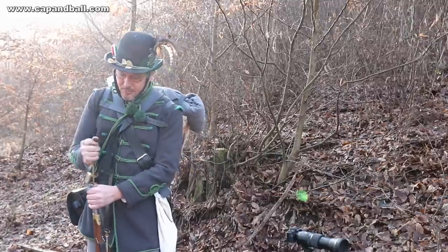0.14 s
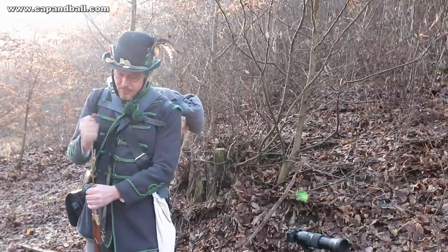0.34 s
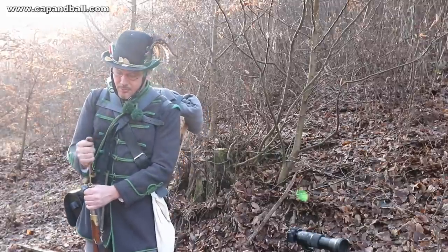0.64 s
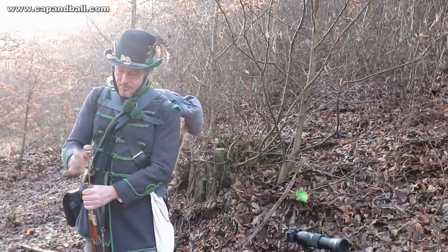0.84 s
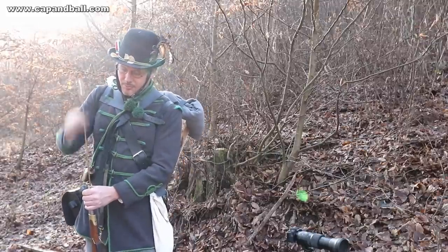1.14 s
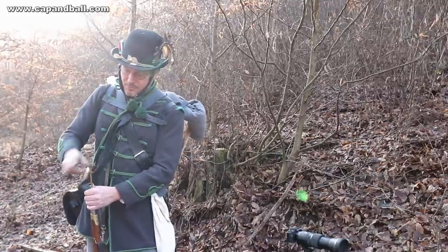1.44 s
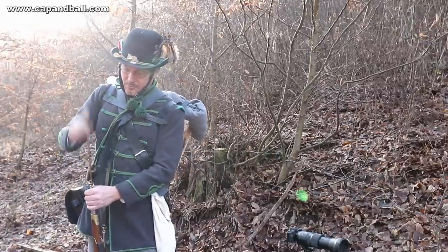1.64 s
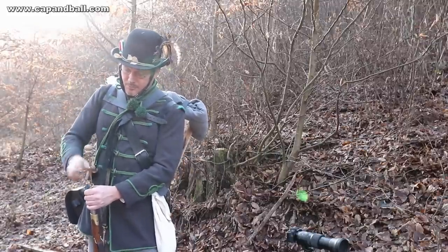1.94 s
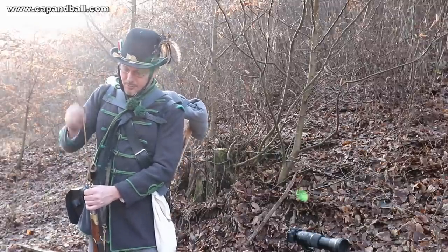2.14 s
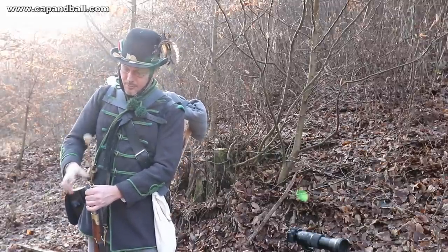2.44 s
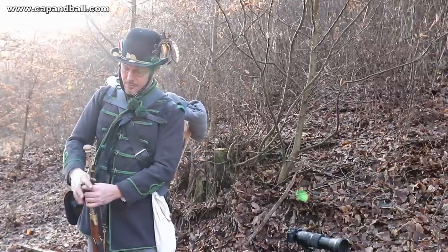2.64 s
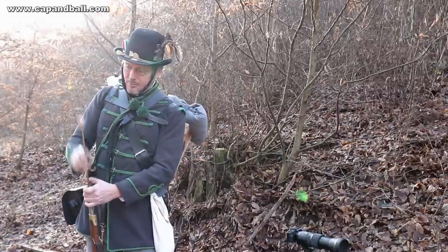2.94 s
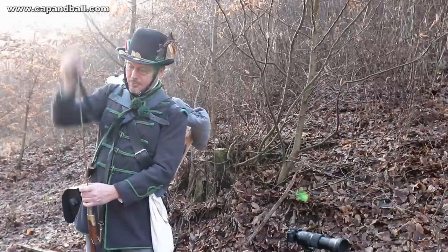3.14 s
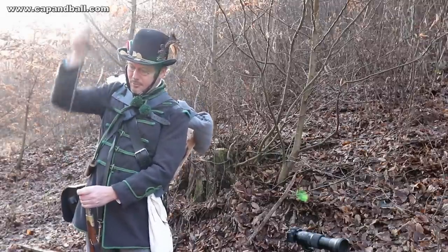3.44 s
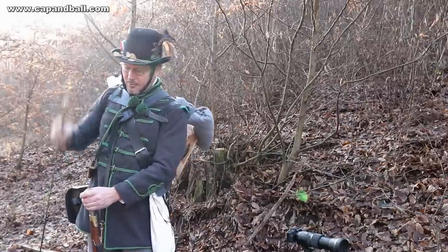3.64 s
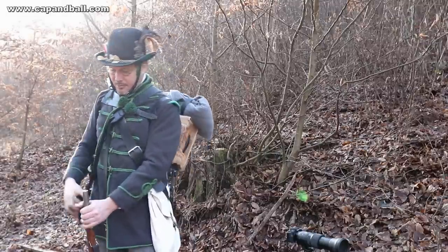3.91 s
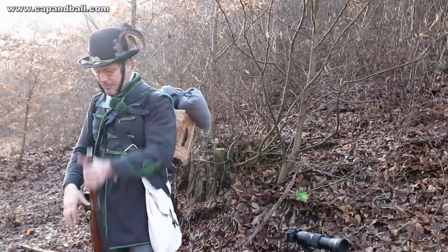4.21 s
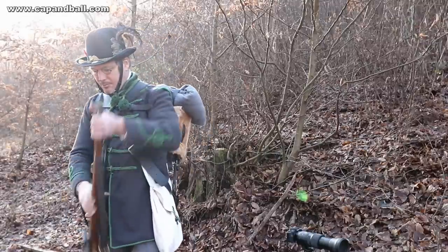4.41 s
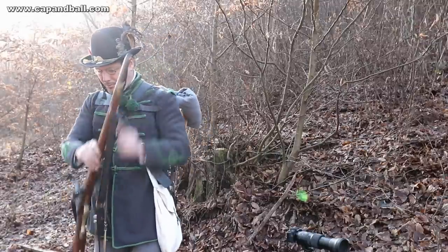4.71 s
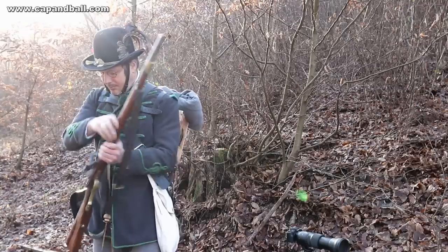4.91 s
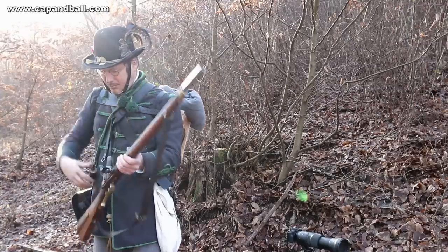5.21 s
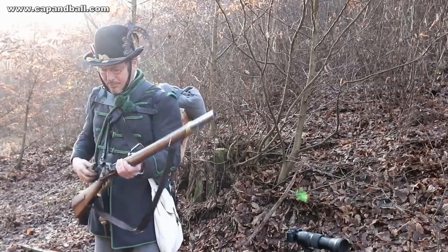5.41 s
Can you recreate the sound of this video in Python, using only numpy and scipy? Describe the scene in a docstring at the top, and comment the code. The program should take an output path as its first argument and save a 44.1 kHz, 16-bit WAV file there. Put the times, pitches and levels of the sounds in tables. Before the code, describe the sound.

Bright steel clacks and scraping of a rod ramming a ball down a rifle, small handling clicks, then a far-off shot at the end.

```python
"""A quiet wood: a ball is rammed down a muzzle-loading rifle that stands to the left.
Ramrod: coloured random contacts through steel modes; each stop on the ball is a band-passed click with gun ring.
Handling: short bursts of contacts, metallic for the fittings, dull for the stock; one small 3 kHz ping of the gear.
Far shot: N-shaped pulses, a low boom and enveloped noise rolling through the trees.
Background: shaped noise for still air, a distant drone and soft low thuds."""
import sys
import numpy as np
from scipy import signal
from scipy.fft import rfft, irfft, next_fast_len
from scipy.io import wavfile
from scipy.ndimage import map_coordinates

SR = 44100
rng = np.random.default_rng(int(sys.argv[2]) if len(sys.argv) > 2 else 0)


def dump_mix(stems):
    """Bounce the given channels to the path in sys.argv[1] as a 16-bit WAV at rate SR."""
    frames = np.atleast_2d(stems).T  # one column per channel
    limited = np.clip(frames, -1, 1)  # hard clip at full scale
    pcm = np.round(limited * 32767).astype(np.int16)
    wavfile.write(sys.argv[1], SR, pcm)


N = 245195
TIME = np.arange(N) / SR

# Levels are relative, before the gains in the functions. decay_s and swell_s are 1/e times.
# Still air: hz, density_db
AIR_COLOUR = [(12, -58), (20, -27), (55, -2), (177, -14), (228, -8), (446, -16.5), (527, -17.5),
              (698, -23.5), (923, -24), (1120, -24), (1220, -23), (1530, -25), (5230, -33.5), (8410, -29.5),
              (16000, -38.5)]
# Distant drone, swelling and sinking: time_s, level_db
DRONE_LEVEL = [(0, -73), (.8, -57.5), (1.25, -44.5), (1.7, -50.5), (2.8, -59), (3.6, -48.5), (4.2, -48.5),
               (4.7, -55), (5.56, -52.5)]
# Drone spectrum: hz, density_db
DRONE_COLOUR = [(100, -32.5), (195, -10.5), (235, 6), (285, -8), (335, 1.5), (400, -5), (480, -12),
                (700, -28.5), (1200, -35.5)]
# Soft low thuds: peak_s, level_db, decay_s
THUDS = [(.005, -40.5, 0.019), (3.31, -50, 0.072), (3.427, -39.5, 0.026)]
# Thud spectrum: hz, density_db
THUD_COLOUR = [(20, -24.5), (50, -2.5), (90, 3), (130, -8.5), (250, -17), (800, -41)]
# Far shot, direct and off a slope: start_s, level_db, pulse_length_s
SHOT_PULSES = [(5.3347, -26, 0.0009), (5.3395, -11.5, 0.00092), (5.348, -13, 0.0012), (5.368, -15, 0.0011)]
# Roll through the trees: time_s, level_db
ROLL_LEVEL = [(5.30, -19.5), (5.350, -21.5), (5.362, -25), (5.395, -27), (5.422, -27.5), (5.45, -22.5),
              (5.48, -23.5), (5.53, -22.5), (5.6, -32)]
# Roll spectrum: hz, density_db
ROLL_COLOUR = [(120, -39), (200, -11.5), (254, -24), (433, -8.5), (496, -10.5), (954, 0.5), (1340, -5),
               (2290, -21.5), (2580, -21), (4750, -37), (7000, -48), (9100, -41), (15400, -120)]
# Left-right correlation of sound from all around: hz, correlation (-1..1)
LIKENESS = [(60, 0.9), (180, 0.92), (550, .5), (1650, -0.13), (5000, 0.29), (15000, -0.34)]
# Clicks of small metal fittings: peak_s, level_db, decay_s
FITTINGS = [(3.8128, -40.5, .0072), (3.942, -37, 0.014), (3.983, -47, 0.0078), (4.0425, -45, .006),
            (4.1506, -45, .008), (4.1937, -33, 0.011), (4.431, -39.5, 0.007), (4.471, -45.5, 0.022),
            (4.5274, -37, 0.0025), (4.566, -45.5, 0.034), (5.417, -33.5, 0.012)]
# Fitting spectrum: hz, density_db
FITTING_COLOUR = [(500, -24.5), (1500, -16.5), (4000, -11.5), (7000, -2.5), (9000, -0.5), (11500, -4.5),
                  (13000, -8.5), (16000, -18.5)]
# Dull bumps on the wooden stock: peak_s, level_db, decay_s
BUMPS = [(3.857, -35, 0.0042), (4.572, -51.5, 0.043), (5.074, -48.5, 0.021)]
# Bump spectrum: hz, density_db
BUMP_COLOUR = [(100, -26), (500, 2.5), (1000, 1), (1800, 4), (3000, -4), (5000, -29.5), (12000, -23)]
# Ringing modes of rod and barrel: hz, level_db, t60_s
STEEL_MODES = [(1375, -2, .055), (1430, -3, .05), (1605, -1, .06), (2030, -5, .04), (2300, 1, .04),
               (2850, -5, .03), (3600, -5, .03), (4610, -3, .035), (6630, -6, .03), (8110, -8, .04),
               (9000, -6, .09), (9180, -7, .06), (9630, -6, .06), (11800, -4, .03), (12130, -6, .06),
               (12320, -8, .05), (12700, -6, .05)]
# Rod slides in the bore: time_s, low_scrape_db, high_scrape_db
SLIDE = [(0.0, -43, -44), (0.3, -44, -44.5), (0.66, -51, -53), (0.9, -43, -54), (1.07, -61, -47),
         (1.3, -51, -66), (1.45, -42, -42.5), (1.84, -48.5, -51), (2.11, -44, -40), (2.59, -44, -49),
         (2.75, -87, -81), (3.0, -56, -60), (3.21, -52.5, -52), (3.55, -69, -68)]
# Rod strikes the bore wall: peak_s, low_chatter_db, high_chatter_db, decay_s
TOUCHES = [(0.1755, -24, -21.5, 0.011), (0.2035, -28.5, -22.5, 0.023), (0.2559, -30.5, -30, 0.0043),
           (0.4669, -29, -26.5, 0.018), (0.873, -32, -24, 0.0087), (0.9214, -28.5, -25.5, 0.0061),
           (0.97, -32, -30.5, 0.017), (0.9982, -30, -23, 0.01), (1.046, -39, -31.5, 0.017),
           (1.078, -32.5, -27, .011), (1.161, -48, -33, .016), (1.2815, -40.5, -35.5, 0.079),
           (1.569, -36.5, -28.5, 0.042), (1.637, -60, -26, 0.005), (1.7686, -32.5, -29, 0.015),
           (1.911, -39, -31.5, 0.01), (1.9224, -27, -28, 0.0095), (2.056, -25.5, -23.5, 0.012),
           (2.1552, -31.5, -22.5, 0.014), (2.3391, -29.5, -24.5, 0.005), (2.3834, -47, -30, 0.0081),
           (2.5618, -37.5, -30.5, 0.021), (2.601, -42, -31, 0.023), (2.7624, -34, -32, 0.0099),
           (2.9714, -49.5, -33, 0.0035), (3.036, -40.5, -46, 0.018), (3.11, -47, -35, .007),
           (3.302, -37, -33.5, 0.063), (3.3723, -34, -28, 0.004)]
# Rod lands: peak_s, low_chatter_db, high_chatter_db, decay_s, knock_db, knock_hz, gun_ring_db, ping_db
BLOWS = [(0.0638, -27.5, -29.5, 0.0077, 0.5, 2380, -5, -20), (.3358, -27, -22, 0.018, -1, 2280, 2.5, -18.5),
         (0.6126, -25.5, -22, 0.02, -3, 2150, 2.5, -20), (0.8541, -30, -25.5, 0.03, -1.5, 1656, 2.5, -16.5),
         (1.5056, -17.5, -13, 0.013, -11, 2420, -10.5, -18.5),
         (1.9872, -17.5, -14, 0.014, -12, 1760, 0, -28), (2.4765, -22, -17, 0.0094, -6.5, 1610, 2, -8.5),
         (2.7106, -32, -25, 0.016, -46, 1690, -14.5, -16)]
# Low chatter and scrape spectrum: hz, density_db
LOW_CHATTER_COLOUR = [(150, -13.5), (600, -12), (1050, -12), (1400, -6.5), (2400, 2), (3200, 0.5),
                      (4200, -1.5), (5500, -0.5), (9000, -86.5)]
# High chatter and scrape spectrum: hz, density_db
HIGH_CHATTER_COLOUR = [(2000, -37.5), (3800, -26), (5000, 0.5), (6600, 1), (9000, -3), (12000, -5),
                       (13500, -6.5), (15500, -15)]
# High ping of the rod: hz, density_db
PING_COLOUR = [(6000, -24), (10000, -6), (11400, -15), (12200, 4), (13000, -13.5), (14000, -9),
               (16000, -11)]
# Thin steel rasps of the rod; the last row is a small 3 kHz ping of the gear:
# peak_s, level_db, swell_and_decay_s
RASPS = [(1.83, -47, 0.052), (3.182, -43, 0.018), (3.224, -42, 0.0072), (5.08, -45, 0.0067)]
# Spectrum of rasps and gear ping: hz, density_db
RASP_COLOUR = [(1200, -20), (2500, 12), (3150, 17), (4000, 14), (5200, -16), (10000, -49)]
# Modes of the loaded gun under a blow: hz, level_db, t60_s
GUN_MODES = [(167, -35.5, 0.034), (357, -27.5, 0.016), (612, -26.5, 0.017), (932, -24, 0.018),
             (1378, -16, .018), (1890, -21, 0.032), (2440, -26, 0.016), (2920, -16, 0.014),
             (3563, -13, 0.0069)]
# Left minus right for sound from the rifle: hz, difference_db
SHADING = [(100, -1), (1200, -1), (2400, -4.5), (4400, -2.5), (8000, -.5), (12000, 5), (15000, 5)]
# Echoes from the trees: hz, gain_db
WOOD_COLOUR = [(100, -22.5), (800, -9), (1800, -9.5), (2600, -1.5), (4000, -5.5), (8000, -9), (16000, -16)]

BOOM_HZ, BOOM_DB, BOOM_T60_S = 90, -19, 0.1
# Ticks after a fitting click: mean gap, level relative to the click, loss per further tick
SWING_S, FIRST_SWING_DB, SWING_LOSS_DB, SWING_DECAY_S = .028, -12.5, 6.5, 0.0091
# Light touches while the rod moves; level relative to the scrape
LIGHT_TOUCHES_PER_S = 13
LIGHT_TOUCH_DB, LIGHT_TOUCH_SPREAD_DB, LIGHT_TOUCH_DECAY_S = 9, 4, .008
BLOW_SWELL_S, PING_DECAY_S = 0.0081, 0.012
# Rattle before and shiver after a blow; levels relative to its chatter
RUN_IN_S, RUN_IN_DECAY_S, RUN_IN_LOW_DB, RUN_IN_HIGH_DB = 0.023, 0.018, -11, -13
SHIVER_DECAY_S, SHIVER_LOW_DB, SHIVER_HIGH_DB = 0.039, -16.5, -9
CUTOFF_HZ = 15900


def from_db(db):
    """Decibels to amplitude gain."""
    return 10 ** (np.asarray(db) / 20)


def rms_one(x):
    """Scale to unit rms."""
    return x / np.sqrt(np.mean(x ** 2) + 1e-20)


def level(rows, axis=1):
    """Gain in time from a dB column, -120 dB outside the curve."""
    rows = np.array(rows)
    return from_db(np.interp(TIME, rows[:, 0], rows[:, axis], left=-120, right=-120))


def at_hz(points, hz):
    """Read a spectrum on a log-frequency axis."""
    points = np.array(points)
    return np.interp(np.log(hz + 1), np.log(points[:, 0]), points[:, 1])


def colour(x, spectrum, size=4096):
    """Minimum-phase filter with the given spectrum, by folding the cepstrum."""
    log_gain = np.log(from_db(at_hz(spectrum, np.fft.rfftfreq(size, 1 / SR))))
    cepstrum = irfft(log_gain)
    cepstrum[1:size // 2] *= 2
    cepstrum[size // 2 + 1:] = 0
    response = irfft(np.exp(rfft(cepstrum)))
    response = response.reshape((1,) * (x.ndim - 1) + (-1,))
    return signal.oaconvolve(x, response, axes=-1)[..., :x.shape[-1]]


def coloured_unit(x, spectrum):
    """Colour a white signal, keeping its power."""
    gains = from_db(at_hz(spectrum, np.linspace(0, SR / 2, num=4096)))
    return colour(x, spectrum) / np.sqrt(np.mean(gains ** 2))


def ring(x, hz, t60_s):
    """Two-pole resonator: a unit click rings as a decaying sine of starting height 1."""
    radius = from_db(-60 / (t60_s * SR))
    angle = 2 * np.pi * hz / SR
    return signal.lfilter([0, np.sin(angle)], [1, -2 * radius * np.cos(angle), radius ** 2], x + 1e-18)


def burst(peak_s, decay_s, swell_s):
    """Envelope rising exponentially to a peak of 1 and decaying after it."""
    out = np.zeros(N)
    near = slice(max(int((peak_s - .1) * SR), 0), int((peak_s + .3) * SR))
    after_s = TIME[near] - peak_s
    out[near] = np.exp(np.minimum(after_s / swell_s, -after_s / decay_s))
    return out


def wander(per_s):
    """Random line through 1000 normal knots, per_s knots a second; holds the last one."""
    knots = rng.standard_normal(1000)
    return np.interp(TIME * per_s, np.arange(len(knots)), knots)


def contacts(per_s, spread_db):
    """Random impacts of uneven size and sign, partly shared by the sides; about unit rms."""
    excess_db = spread_db * np.minimum(rng.exponential(1, (3, N)), 4)
    sizes = from_db(excess_db) * rng.choice([-1, 1], (3, N))
    stream = rms_one(sizes * (rng.random((3, N)) < per_s / SR))
    own_share = .3  # of the power on each side
    return np.sqrt(1 - own_share) * stream[0] + np.sqrt(own_share) * stream[1:]


def surround(spectrum):
    """Diffuse noise whose left-right correlation follows LIKENESS; unit rms."""
    size = next_fast_len(N)
    hz = np.fft.rfftfreq(size, 1 / SR)
    alike = np.clip(at_hz(LIKENESS, hz), -1, 1)
    mid, side = rfft(rng.standard_normal((2, size)))
    both = np.sqrt(1 + alike) * mid + np.sqrt(1 - alike) * side * [[1], [-1]]
    return rms_one(irfft(both * from_db(at_hz(spectrum, hz)), size)[:, :N])


def background():
    """Still air, a distant drone and a few soft low thuds, all shaped noise."""
    air = from_db(-49.5) * surround(AIR_COLOUR)
    drone = level(DRONE_LEVEL) * surround(DRONE_COLOUR)
    thuds = sum(from_db(db) * burst(s, decay_s, swell_s=0.018) for s, db, decay_s in THUDS)
    return air + drone + thuds * surround(THUD_COLOUR)


def far_shot():
    """Dulled N-shaped pulses, a low boom, then the roll of echoes from wooded slopes."""
    arrival_s = SHOT_PULSES[0][0]
    pulses = np.zeros(N)
    for s, db, length_s in SHOT_PULSES:
        inside = (TIME >= s) & (TIME < s + length_s)
        pulses += from_db(db) * (2 * (TIME - s) / length_s - 1) * inside
    pulses = signal.sosfilt(signal.butter(4, 2100, fs=SR, output="sos"), pulses)
    start = signal.unit_impulse(N, round(arrival_s * SR))
    boom = from_db(BOOM_DB) * ring(start, BOOM_HZ, BOOM_T60_S)
    opening = np.clip((TIME - arrival_s) / .0005, 0, 1)
    echoes = surround(ROLL_COLOUR) + from_db(-17.0) * surround(THUD_COLOUR)
    return pulses + boom + opening * level(ROLL_LEVEL) * echoes


def steel(x, ring_db, direct_db):
    """Contacts heard directly and through rod and barrel modes, favoured by turns as the contact moves."""
    rings = 0
    for hz, mode_db, t60_s in STEEL_MODES:
        drive = x * from_db(4.5 * wander(per_s=20))
        unit_peak = 2 * np.log(1000) / (t60_s * SR)  # about unity gain at resonance
        rings = rings + from_db(mode_db) * ring(drive, hz, t60_s) * unit_peak
    return from_db(direct_db) * x + from_db(ring_db) * rings


def fitting_clicks(count=3):
    """Each click, then lighter ticks at uneven gaps as the fitting swings; rows like FITTINGS."""
    delays_s = SWING_S * np.cumsum(rng.uniform(.6, 1.4, (len(FITTINGS), count)), axis=1)
    clicks = list(FITTINGS)
    for (s, db, _), row in zip(FITTINGS, delays_s):
        for k, delay_s in enumerate(row):
            clicks.append((s + delay_s, db + FIRST_SWING_DB - SWING_LOSS_DB * k, SWING_DECAY_S))
    return clicks


def handling():
    """Fittings click and hands bump the stock as the rifle is taken up."""
    clicks = sum(from_db(db) * burst(s, decay_s, swell_s=0.00048) for s, db, decay_s in fitting_clicks())
    bumps = sum(from_db(db) * burst(s, decay_s, swell_s=0.0012) for s, db, decay_s in BUMPS)
    metal = coloured_unit(clicks * contacts(per_s=7600, spread_db=4.5), FITTING_COLOUR)
    wood = coloured_unit(bumps * contacts(per_s=15000, spread_db=4.5), BUMP_COLOUR)
    return steel(metal, ring_db=-3.5, direct_db=4.0) + wood


def touches():
    """Hard touches, plus light ones at uneven gaps that follow the slide level; rows like TOUCHES."""
    chance = rng.random((60, 3))
    times_s = np.cumsum(.3 + 1.4 * chance[:, 0]) / LIGHT_TOUCHES_PER_S
    slide_s, low_db, high_db = np.transpose(SLIDE)
    over_db = LIGHT_TOUCH_DB + LIGHT_TOUCH_SPREAD_DB * (2 * chance[:, 1:] - 1)
    rows = list(TOUCHES)
    for s, (low_over, high_over) in zip(times_s, over_db):
        if s < slide_s[-1]:
            low = np.interp(s, slide_s, low_db) + low_over
            high = np.interp(s, slide_s, high_db) + high_over
            rows.append((s, low, high, LIGHT_TOUCH_DECAY_S))
    return rows


def strokes():
    """Rattle on the way in, chatter on landing, shiver afterwards: envelope, low_db, high_db."""
    hits = []
    for s, low, high, decay_s, *_ in BLOWS:
        run_in = burst(s - RUN_IN_S, RUN_IN_DECAY_S, swell_s=0.003)
        shiver = burst(s, SHIVER_DECAY_S, BLOW_SWELL_S)
        hits += [(run_in, low + RUN_IN_LOW_DB, high + RUN_IN_HIGH_DB),
                 (burst(s, decay_s, BLOW_SWELL_S), low, high),
                 (shiver, low + SHIVER_LOW_DB, high + SHIVER_HIGH_DB)]
    return hits


def rod_chatter_and_rasps(touched, first_contact_db=15.0):
    """The whipping rod rattles on the bore and scrapes as it slides; thin rasps and a gear ping join in."""
    hits = strokes()
    hits += [(burst(s, decay_s, swell_s=0.00063), low, high) for s, low, high, decay_s in touched]
    low_force = np.sqrt(sum((shape * from_db(low)) ** 2 for shape, low, _ in hits))
    high_force = np.sqrt(sum((shape * from_db(high)) ** 2 for shape, _, high in hits))
    ping_force = sum(from_db(db) * burst(s, PING_DECAY_S, swell_s=0.0023) for s, *_, db in BLOWS)
    rasp_force = sum(from_db(db) * burst(s, length_s, length_s) for s, db, length_s in RASPS)

    rattle = contacts(per_s=8000, spread_db=2.5)
    scrape = contacts(per_s=3000, spread_db=3.5)
    rattle = rattle * from_db(1.8 * wander(per_s=300))  # bounces in clusters
    # every touch opens with one hard contact
    rattle[:, [round(row[0] * SR) for row in touched]] += from_db(first_contact_db)
    scrape = scrape * from_db(2.5 * wander(per_s=90))

    low = from_db(1.0) * rattle * low_force + from_db(-1.5) * scrape * level(SLIDE, axis=1)
    high = rattle * high_force + from_db(1.0) * scrape * level(SLIDE, axis=2)
    ping = contacts(per_s=9000, spread_db=1.5) * ping_force
    struck = coloured_unit(low, LOW_CHATTER_COLOUR) + coloured_unit(high, HIGH_CHATTER_COLOUR)
    struck = struck + coloured_unit(ping, PING_COLOUR)
    rasps_and_gear_ping = coloured_unit(scrape * rasp_force, RASP_COLOUR)
    return steel(struck, ring_db=1.5, direct_db=-2.5) + rasps_and_gear_ping


def clinks(touched, clink_db=-11.0, spread_db=5.5, count=6):
    """Each touch rings the first modes, with strengths that depend on the contact point (random)."""
    s, db = np.transpose(touched)[:2]
    shares = rng.standard_normal((100, count))[:len(s)]
    out = np.zeros(N)
    for (hz, mode_db, t60_s), share in zip(STEEL_MODES, shares.T):
        kicks = np.zeros(N)
        kicks[np.round(s * SR).astype(int)] = from_db(db + clink_db + mode_db + spread_db * share)
        out += ring(kicks, hz, t60_s)
    # leaves only the clear ring, without a dull thud under it
    return signal.sosfilt(signal.butter(4, 1150, "high", fs=SR, output="sos"), out + 1e-18)


def band_click(kick, hz, ratio):
    """Click band-passed from hz / ratio to hz * ratio."""
    return signal.sosfilt(signal.butter(2, [hz / ratio, hz * ratio], "band", fs=SR, output="sos"), kick)


def knocks(crack_db=22.5, edge_db=-13, rebound_db=-6.5, rebound_s=0.00155):
    """Rod stops dead on the ball: short crack with broad edge, quick rebound, ring of the whole gun."""
    out = np.zeros(N)
    kick = signal.unit_impulse(SR // 10)
    body = 0
    for k, (hz, db, t60_s) in enumerate(GUN_MODES):
        body = body + from_db(db) * ring(kick, hz, t60_s) * (-1) ** k  # alternate polarity
    delays_s = rebound_s * rng.uniform(.92, 1.08, len(BLOWS))
    for (s, *_, knock_db, hz, body_db, _), delay_s in zip(BLOWS, delays_s):
        crack = band_click(kick, hz, 1.195) + from_db(edge_db) * band_click(kick, hz, 2.24)
        crack = crack + from_db(rebound_db) * np.roll(crack, round(delay_s * SR))
        at = round(s * SR)
        out[at:at + len(kick)] += from_db(knock_db + crack_db) * 2 * crack + from_db(body_db) * body
    return out


def scatter(x, t60_s, delay_s):
    """Countless small reflections, different on each side, that build up and die away."""
    t = TIME[:SR]
    echoes = rng.standard_normal((2, SR)) * from_db(-60 * t / t60_s)
    echoes *= 1 - np.exp(-(t / delay_s) ** 2)
    echoes /= np.sqrt(np.sum(echoes ** 2, axis=1, keepdims=True))
    return signal.oaconvolve(x, echoes, axes=1)[:, :N]


def from_rifle(x, lead_s=.000072):
    """Rifle to the left: sound arrives there first, and the microphone housing shades each side."""
    left = colour(x[0], [(hz, db / 2) for hz, db in SHADING])
    right = colour(x[1], [(hz, -db / 2) for hz, db in SHADING])
    right = map_coordinates(right, [np.arange(N) - lead_s * SR], order=3)
    return np.array([left, right])


def scene():
    """The rifle, its reflections from leaves and trunks, and the wood around."""
    touched = touches()
    chatter = rod_chatter_and_rasps(touched) + clinks(touched) + handling()
    knock = knocks()
    near = scatter(from_db(-11) * chatter + from_db(-13) * knock, t60_s=.035, delay_s=.0007)
    trees = from_db(-19.5) * colour(scatter(chatter + knock, t60_s=1.0, delay_s=.03), WOOD_COLOUR)
    rifle = from_rifle(from_db(-0.42) * chatter + knock)
    return rifle + near + trees + far_shot() + background()


def record(dry, top=0.75):
    """Soft limiting rounds off the hardest peaks; a steep low-pass cuts the highest treble."""
    rounded = dry / (1 + (dry / top) ** 4) ** (1 / 4)
    return signal.sosfilt(signal.ellip(12, .1, 70, CUTOFF_HZ, fs=SR, output="sos"), rounded)


dry = scene()
out = record(dry)
dump_mix(out)
```